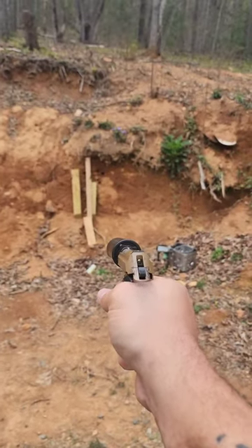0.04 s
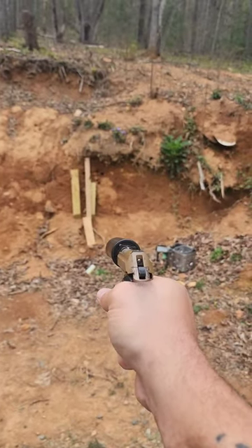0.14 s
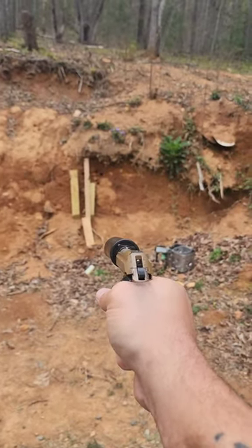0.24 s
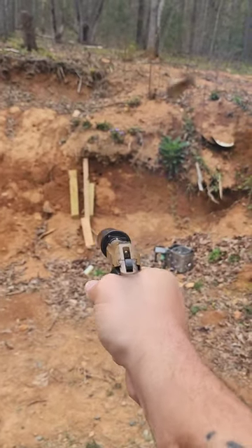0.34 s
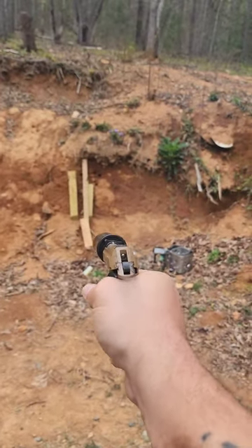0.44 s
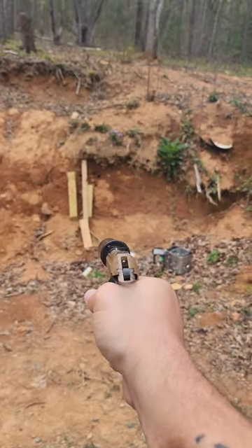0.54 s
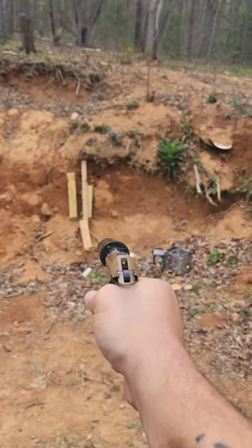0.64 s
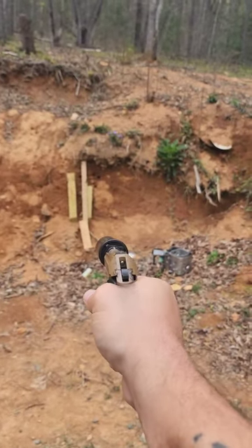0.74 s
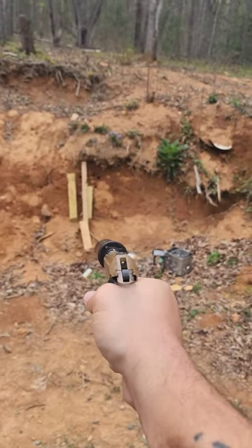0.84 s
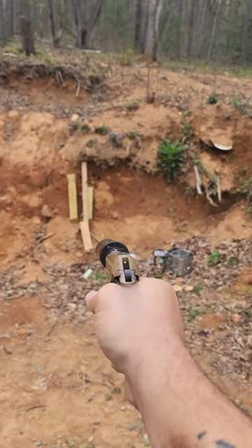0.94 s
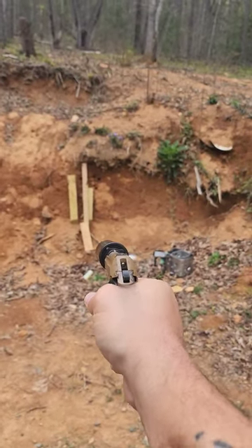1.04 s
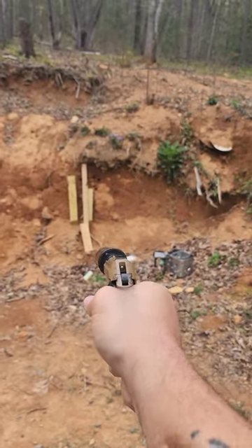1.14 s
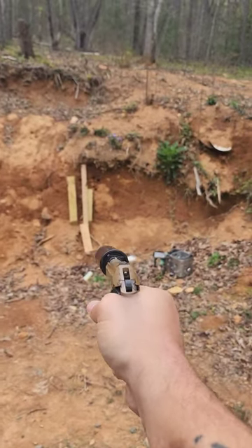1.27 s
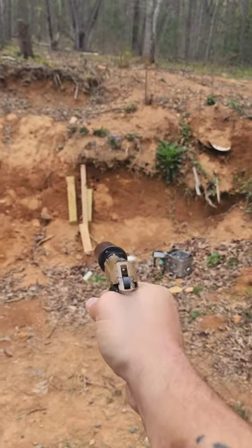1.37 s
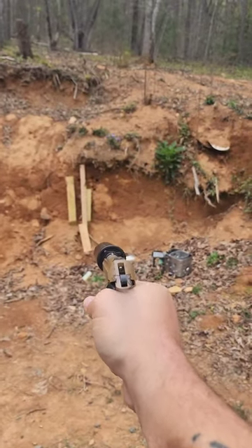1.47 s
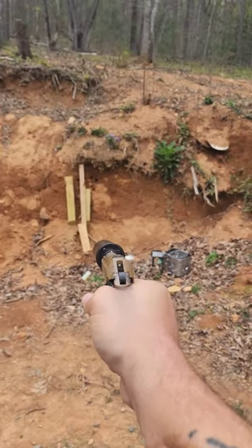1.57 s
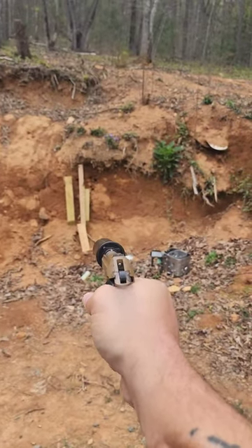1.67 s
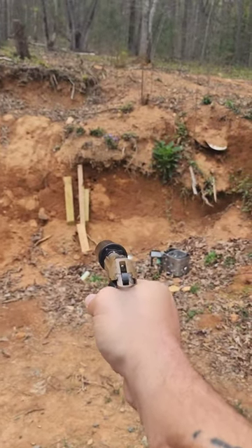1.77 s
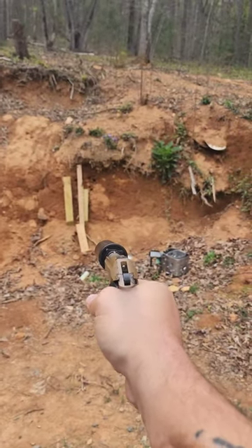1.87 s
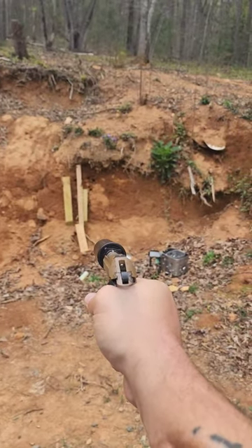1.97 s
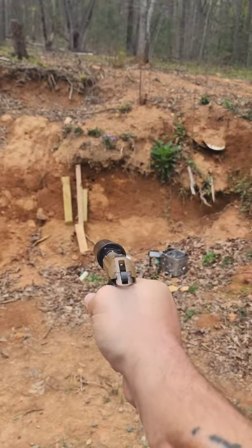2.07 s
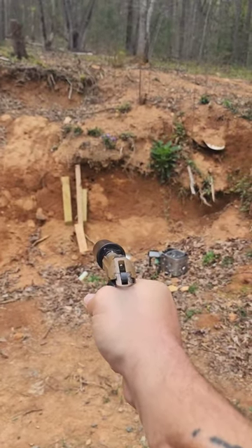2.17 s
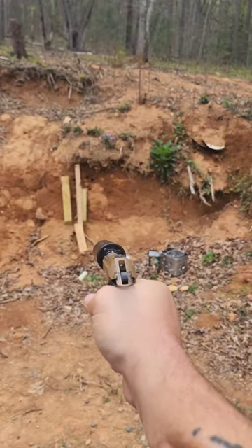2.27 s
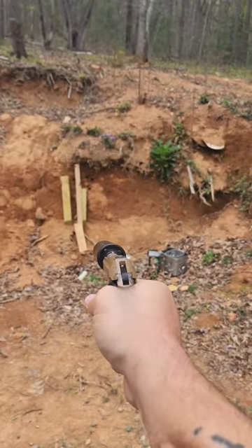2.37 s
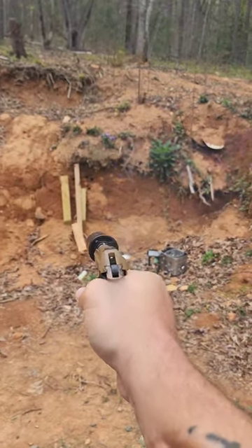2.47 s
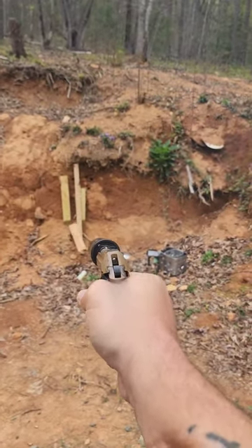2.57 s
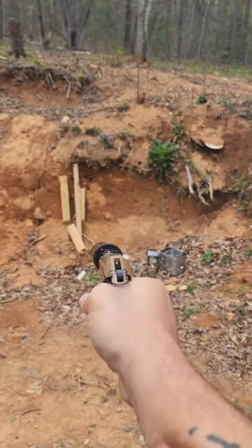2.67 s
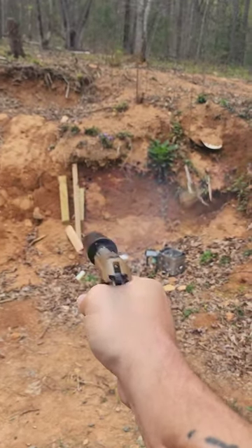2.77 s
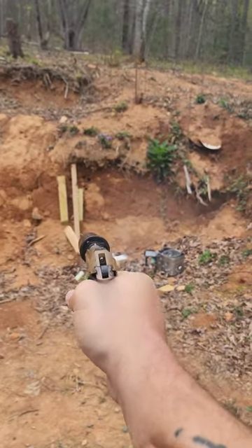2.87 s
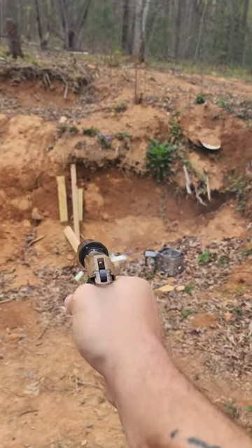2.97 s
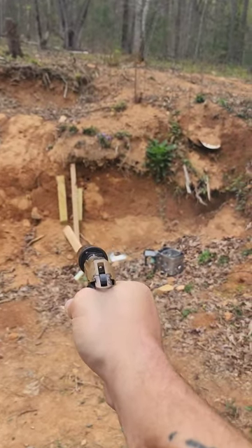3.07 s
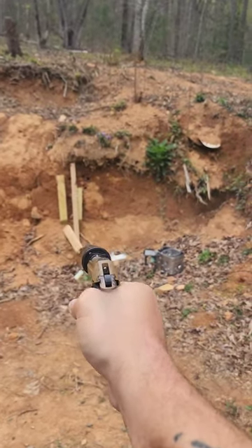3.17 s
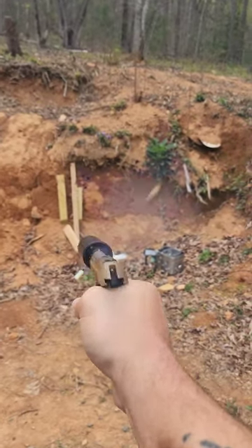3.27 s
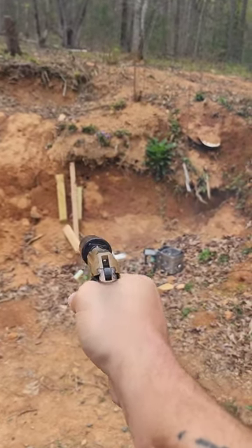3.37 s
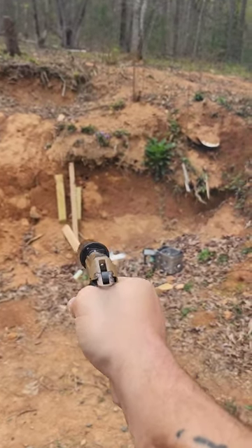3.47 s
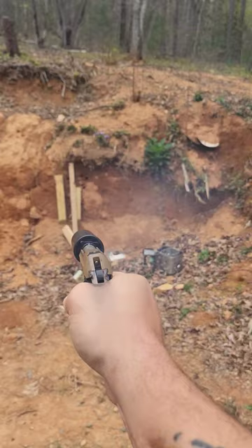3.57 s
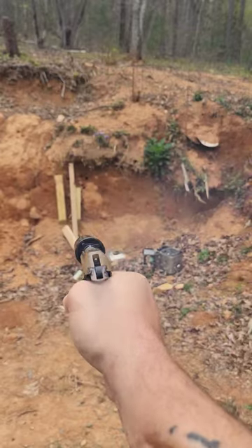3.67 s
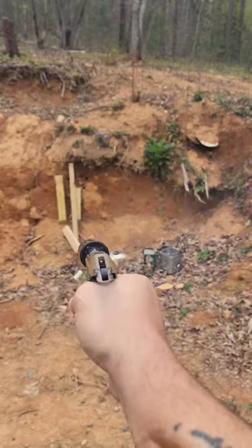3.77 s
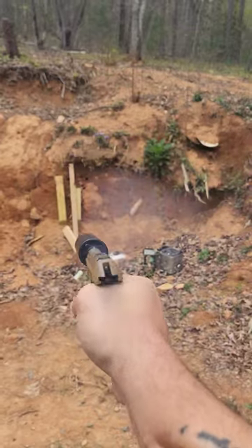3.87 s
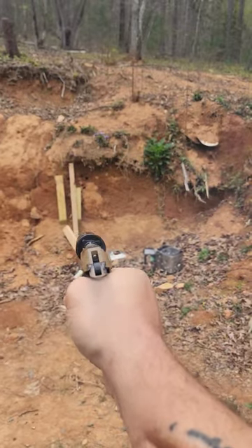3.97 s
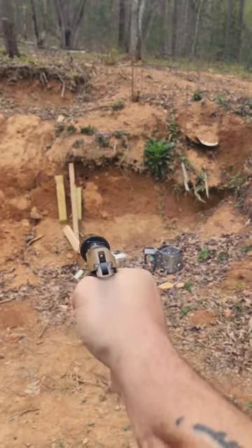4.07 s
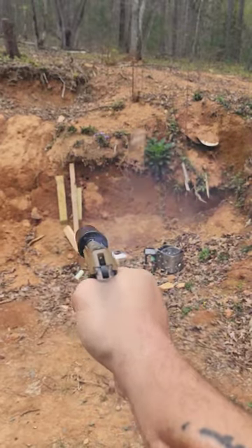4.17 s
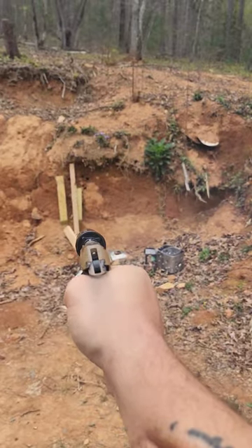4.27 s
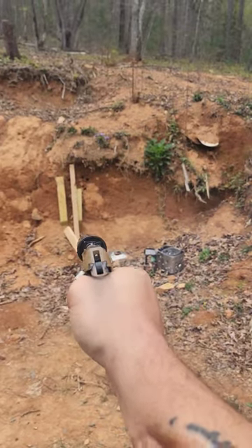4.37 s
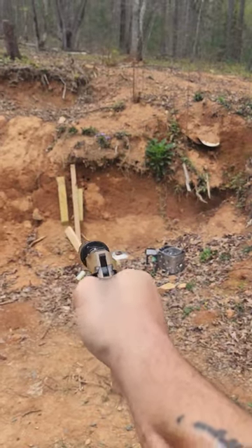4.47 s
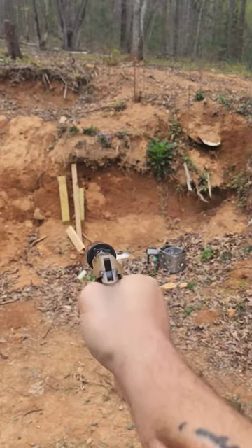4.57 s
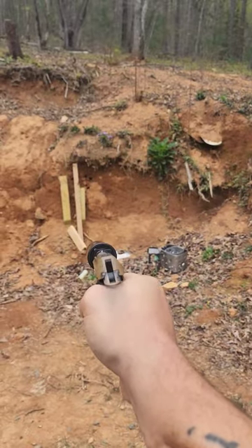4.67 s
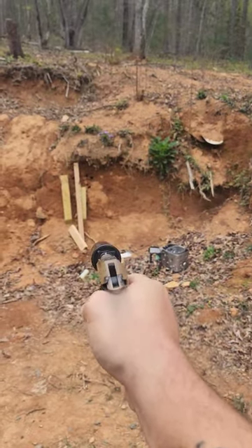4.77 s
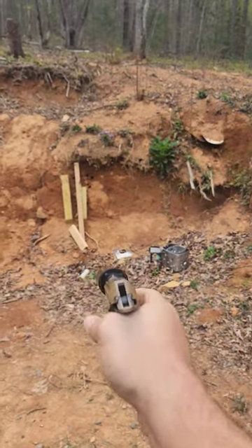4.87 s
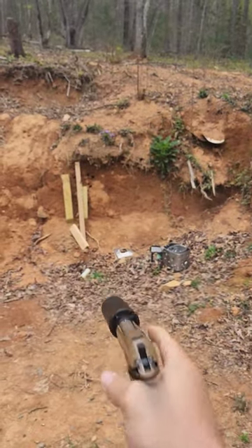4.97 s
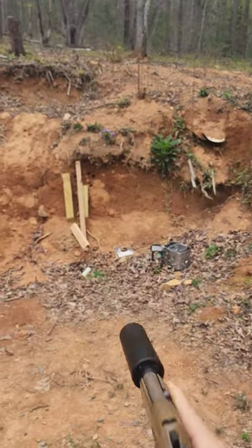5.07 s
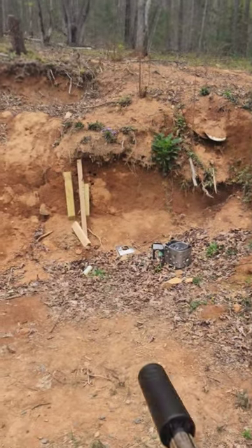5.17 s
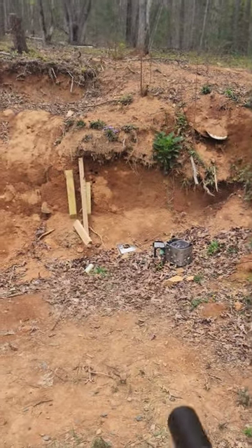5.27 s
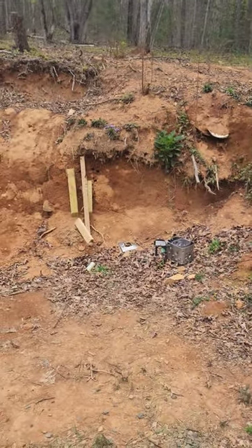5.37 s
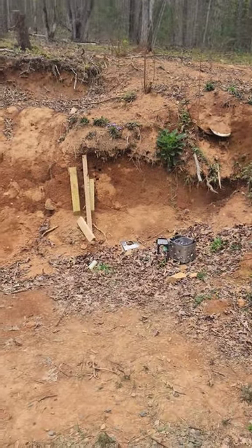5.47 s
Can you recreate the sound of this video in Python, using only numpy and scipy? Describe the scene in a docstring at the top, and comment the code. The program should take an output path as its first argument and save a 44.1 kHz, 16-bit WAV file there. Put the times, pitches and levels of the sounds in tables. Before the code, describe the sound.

At arm's length, a suppressed small pistol cracks once, slapping off a dirt bank and washing through woods. A sharp steel click and ringing brass case break the pause, over very faint breeze and distant engine hum, with one far crow caw. Six rapid shots follow, then a loud dry click and small handling ticks. Close stereo pickup, slightly saturated on the peaks.

```python
"""A suppressed small pistol fires once, then six times in a quick string, at arm's length from a stereo pair.
Each report slaps back from an earth bank and washes away through the woods; the action clicks, cases tinkle.
In the pause a far engine hums and a crow caws once.
Gas, clicks and woods are shaped noise, brass and thumps are damped sines, steel is noise through resonances;
the caw is a stack of harmonics and the engine one unsteady sine."""
import sys
import numpy as np
from scipy import signal
from scipy.fft import rfft, irfft, next_fast_len
from scipy.io import wavfile
from scipy.ndimage import uniform_filter1d, map_coordinates

SR = 44100
rng = np.random.default_rng(int(sys.argv[2]) if len(sys.argv) > 2 else 0)


def dump(signal):
    """Clip the signal to [-1, 1] and save it as 16-bit WAV at the path in sys.argv[1]."""
    limited = np.clip(np.atleast_2d(signal).T, -1, 1)
    pcm = np.round(limited * 32767).astype(np.int16)
    wavfile.write(sys.argv[1], SR, pcm)


N = 244088
TIME = np.arange(N) / SR
SHORT = TIME[:SR // 3]  # the time axis of every brief sound

# the shots: [t/s, blast level/dB, extra bass/dB, echo level/dB]
SHOT_TIMELINE = [(.380, -8, -26, -32.8), (2.5086, -10, 0, -35), (2.8824, -11.5, 1, -40.5),
                 (3.3853, -12, -1, -41), (3.652, -11.5, 0, -44.5), (3.9883, -11.5, 0.5, -42.5),
                 (4.2759, -12, 2, -44.5)]
# tone of a dry metal click: [f/Hz, relative level/dB]
CLICK_TONE = [(800, -17), (2500, -13), (4500, -7.5), (8000, -0.5), (10500, -1.5), (15000, -5)]
# stereo image of the gun: [f/Hz, left-right likeness from -1 to 1]
NEAR_IMAGE = [(110, 0.9), (260, 0.36), (500, 0.57), (1000, .22), (2500, 0.21), (5000, -0.17)]
# stereo image of the surroundings: [f/Hz, left-right likeness from -1 to 1]
WIDE_IMAGE = [(130, .94), (290, 0.94), (550, 0.48), (1400, 0.072), (3000, 0.14)]


def amp(db):
    """Decibels to gain."""
    return 10 ** (np.asarray(db) / 20)


def unit(x):
    """Scale to rms 1."""
    return x / np.sqrt(np.mean(x ** 2) + 1e-20)


def along(points, hz):
    """Read (Hz, value) points on a log frequency axis."""
    f, v = np.transpose(points)
    return np.interp(np.log(hz + 1), np.log(f + 1), v)


def wobble(rate, size=N):
    """A smooth random curve, rate knots a second."""
    return map_coordinates(rng.standard_normal(size // 20), [np.arange(size) * rate / SR], mode="wrap")


def filtered(x, response):
    """Filter x by a response given as a function of frequency."""
    m = next_fast_len(x.shape[-1] + 8192)
    spectrum = rfft(x, m) * response(np.fft.rfftfreq(m, 1 / SR))
    return irfft(spectrum, m)[..., :x.shape[-1]]


def noise(gain, alike, size=len(SHORT)):
    """Stereo noise of rms 1 with a gain and a left-right likeness for each frequency."""
    def mid_side_gain(hz):
        turn = np.arccos(np.clip(along(alike, hz), -1, 1)) / 2
        return gain(hz) * np.array([np.cos(turn), np.sin(turn)])

    mid, side = filtered(rng.standard_normal((2, size)), mid_side_gain)
    return unit(np.array([mid + side, mid - side]))


def colour(spectrum):
    """The gain of a spectrum as a function of frequency, closed below hearing."""
    return lambda hz: amp(along(spectrum, hz)) * (hz > 20)


def burst(gain, rise, hold, t60):
    """A puff of noise that rises, holds and dies away by 60 dB in t60 (all in s)."""
    decay = amp(-60 * np.maximum(SHORT - hold, 0) / t60)
    return noise(gain, NEAR_IMAGE) * np.minimum(SHORT / rise, 1) * decay


def ring(hz, t60, attack=0.00028):
    """A damped sine with a soft start (times in s)."""
    return np.sin(2 * np.pi * hz * SHORT) * amp(-60 * SHORT / t60) * (1 - np.exp(-SHORT / attack))


def add(track, s, sound):
    """Mix a sound into the track at time s."""
    part = track[:, round(s * SR):][:, :sound.shape[-1]]
    part += sound[..., :part.shape[1]]


def outdoors():
    """A dying breeze in the woods and a far engine's unsteady hum; both dip after each shot, the dips pile up."""
    # tone of the breeze: [f/Hz, relative level/dB]
    breeze_tone = [(25, -15), (95, -8), (170, -19), (290, -20.5), (480, -24), (1000, -28.5), (2100, -39),
                   (3800, -50.5), (4050, -41), (4350, -50), (5000, -52), (8000, -58.5), (15000, -67)]
    hum_hz, hum_db = 92.3, -55.5
    breeze_db, fade_db_per_s = -59.5, 2.4
    # the hum takes the whole dip, the breeze a small share; both creep back exponentially
    shot_dip_db, recover_s, breeze_dip_share = 5.5, 1.9, 0.12
    dip_db = shot_dip_db * sum((TIME > s) * np.exp(-abs(TIME - s) / recover_s) for s, *_ in SHOT_TIMELINE)
    hum_phase = 2 * np.pi * np.cumsum(hum_hz + 3.2 * wobble(9)) / SR
    hum = np.sin(hum_phase) * amp(hum_db - dip_db + 1.5 * wobble(3.6))
    level_db = breeze_db - fade_db_per_s * TIME - breeze_dip_share * dip_db
    breeze = noise(colour(breeze_tone), WIDE_IMAGE, size=N) * amp(level_db + 2.2 * wobble(5))
    return hum + breeze


def crow(trees_db=-4.0, trees_t60=.45):
    """One hoarse, far caw: effort arches pitch and level, the throat favours harmonic two, trees smear it."""
    crest_s, width_s, length_s = 2.168, .055, 0.18
    low_hz, high_hz = 610, 720  # pitch at no effort and at full effort
    crest_db, range_db = -59.5, 12  # level before throat and rasp; its drop towards no effort
    effort = np.exp(-((TIME - crest_s) / width_s) ** 2)
    pitch = low_hz + (high_hz - low_hz) * effort
    sounding = abs(TIME - crest_s) < length_s / 2
    level = amp(crest_db - range_db * (1 - effort)) * sounding
    phase = 2 * np.pi * np.cumsum(pitch * (1 + .035 * wobble(350))) / SR
    rasp = amp(3.5 * wobble(160))
    # resonance of the throat: [f/Hz, level/dB]
    throat = [(700, -29), (1250, -1.5), (1450, 1.0), (2150, -14), (2900, -37.5), (3600, -22.5), (4400, -29.5)]
    voice = sum(amp(along(throat, k * pitch)) * np.sin(k * phase) for k in range(1, 7))
    call = level * rasp * voice
    trees = rng.standard_normal((2, len(SHORT))) * amp(-60 * SHORT / trees_t60)
    trees = trees / np.linalg.norm(trees[0])
    return call + amp(trees_db) * signal.fftconvolve(call[None], trees, axes=1)[:, :N]


def ticks(spread_db=4, ticks_per_s=22):
    """The shifting grip sets off a few plain ticks among runs of tiny ones, each a very short click."""
    # spells in which the grip shifts: [start t/s, end t/s, middle level/dB]
    grip_shifts = [(1.35, 1.5, -74), (1.607, 1.782, -62), (4.729, 5.072, -72), (5.101, 5.498, -75)]
    # the plainest ticks: [t/s, level/dB]
    plain_ticks = [(1.3672, -74), (1.4426, -62), (4.74, -60.5), (4.8746, -63), (4.897, -60.5),
                   (5.2859, -68), (5.4281, -64)]
    out = np.zeros((2, N))
    tiny_ticks = []
    for start, end, db in grip_shifts:
        for place, size in rng.random((round(ticks_per_s * (end - start)), 2)):
            tiny_ticks.append((start + place * (end - start), db + spread_db * (2 * size - 1)))
    for s, db in list(plain_ticks) + tiny_ticks:
        add(out, s, amp(db) * burst(colour(CLICK_TONE), rise=0.00037, hold=0.0012, t60=0.017))
    return out


def handling():
    """Dry steel clicks of the action with a faint echo off the ground, and dull knocks of the hand."""
    # clicks: [t/s, level/dB, body re click/dB, left minus right/dB, echo re click/dB]
    action_clicks = [(1.5358, -23, -22.5, -14, -26.5), (1.6557, -50, -24, -12, -26),
                     (1.694, -46.5, -27, -7, -27), (4.584, -19, -13, 7, -36), (4.8, -48.5, -26, 6, -25)]
    # dull knocks: [t/s, level/dB, bass level/dB]
    hand_knocks = [(0.9935, -46.5, -41.5), (5.022, -44, -44), (5.4888, -53.5, -62)]
    # tone of a knock: [f/Hz, relative level/dB]
    knock_tone = [(50, -12), (250, 1.5), (800, -1.5), (2200, -12), (5000, -22), (15000, -38)]
    out = np.zeros((2, N))
    for s, db, body_db, pan_db, echo_db in action_clicks:
        pan = amp(pan_db / 2 * np.array([[1], [-1]]))
        snap = burst(colour(CLICK_TONE), rise=0.00057, hold=0.0011, t60=0.012) * pan
        body = burst(colour(knock_tone), rise=0.00027, hold=0.0018, t60=0.008)
        echo = burst(colour(CLICK_TONE), rise=0.0047, hold=0.024, t60=0.12)
        add(out, s, amp(db) * (snap + amp(body_db) * body + amp(echo_db) * echo))
    for s, db, bass_db in hand_knocks:
        knock = burst(colour(knock_tone), rise=0.0013, hold=0.0018, t60=0.021)
        bass = ring(hz=116, t60=0.073, attack=0.0023)
        add(out, s, amp(db) * knock + amp(bass_db) * bass)
    return out


def cases():
    """A spent brass case rings in close, beating modes, at new strengths on every touch."""
    # touches on the ground: [t/s, ring level/dB]
    touchdowns = [(.815, -78), (1.537, -43), (1.657, -54), (1.773, -62), (1.824, -72), (4.82, -75),
                  (5.057, -72.5), (5.49, -72)]
    # modes of a case: [f/Hz, mean level/dB, t60/s]
    brass_modes = [(7650, -13, 0.18), (11570, -2, 0.21), (11615, 1, 0.19), (11595, -2, .19),
                   (12390, -17, .3)]
    out = np.zeros((2, N))
    for s, db in touchdowns:
        modes = sum(amp(level + rng.normal(0, 1.3)) * ring(hz, t60) for hz, level, t60 in brass_modes)
        touch = burst(colour(CLICK_TONE), rise=0.00046, hold=.001, t60=0.0081)
        add(out, s, amp(db) * (modes * amp([[-2], [1]]) + amp(2) * touch))
    return out


def swells(growth_db_per_s=1000, length=0.032):
    """The first two reports swell in, wide and hollow: hiss and a wavering tone grow up to a sudden stop."""
    # swells: [crest t/s, hiss level/dB, whoop level/dB, whoop f/Hz]
    rising_swells = [(.3775, -12, -16, 405), (.377, -29, -15.5, 1060), (.374, -28.5, -21, 880),
                     (2.508, -16, -26.5, 1130)]
    # tone of the hiss: [f/Hz, relative level/dB]
    hiss_tone = [(400, -31.5), (2500, -7.5), (8000, -5.5), (13000, -5)]
    out = np.zeros((2, N))
    ahead = SHORT[::-1]  # time left before the crest
    growth = amp(-growth_db_per_s * np.maximum(ahead - .003, 0))
    rising = growth * np.clip(ahead / 0.00051, 0, 1) * np.clip((length - ahead) / .003, 0, 1)
    for s, hiss_db, whoop_db, hz in rising_swells:
        hiss = noise(colour(hiss_tone), NEAR_IMAGE)
        sway = .5 * wobble(120, size=len(SHORT))
        stereo_phase = np.array([[0], [1.6]])  # the right side leads, so the whoop sounds wide
        whoop = np.sin(2 * np.pi * hz * SHORT + sway + stereo_phase)
        add(out, s - len(SHORT) / SR, rising * (amp(hiss_db) * hiss + amp(whoop_db) * whoop))
    return out


def woods(bass, treeline=0.093, spreading=.98, near_db=-4, trunks_db=1.24, patchy_db=1.6):
    """Countless trunks scatter a shot in coloured clumps: strongest at the tree line, then weaker and duller."""
    # tone of the scattered shot: [f/Hz, relative level/dB]
    woods_tone = [(40, -14), (130, -0.5), (280, -1.5), (480, -9.5), (1100, -12.5), (1700, -7), (2150, 0.5),
                  (3200, -2), (4500, 0.5), (6500, -1), (8300, 0.5), (10000, -7), (15000, -11)]
    # decay of the wash, before the loss with distance: [f/Hz, t60/s]
    woods_decay = [(100, 1.9), (1000, 7.6), (2500, 3.9), (5000, 2.22), (8000, 1.2), (12000, 1.1)]
    t = TIME[:2 * SR]
    scattered = noise(lambda hz: colour(woods_tone)(hz) * bass(hz) ** .5, WIDE_IMAGE, size=len(t))
    hz, frames, z = signal.stft(scattered, SR, nperseg=256)
    # random patches in frequency and time
    clumps = uniform_filter1d(rng.standard_normal(z.shape[1:]), size=3, axis=0)
    clumps = unit(uniform_filter1d(clumps, size=16, axis=1))
    decay_db = 60 * frames / along(woods_decay, hz)[:, None]
    wash = signal.istft(z * amp(patchy_db * clumps - decay_db), SR, nperseg=256)[1][:, :len(t)]
    swell = amp(near_db * np.clip((treeline - t) / 0.052, 0, 1)) * np.minimum(t / 0.021, 1)
    distance = np.maximum(t / (treeline + 0.016), 1) ** -spreading
    trunks = amp(trunks_db * wobble(300, size=len(t)) + .8 * wobble(34, size=len(t)))
    return wash * swell * distance * trunks


def steel(hz):
    """The resonances of slide and barrel, summed as band-pass peaks."""
    # modes: [f/Hz, width/Hz, level/dB]
    steel_modes = [(2720, 130, -5.5), (4680, 32, -6), (5030, 69, -5), (5510, 41, -3), (6240, 140, -5.5),
                   (6470, 79, -7), (7420, 90, -4), (8180, 150, -3), (11330, 500, -8.5)]
    return abs(sum(amp(db) * 1j * hz * w / (c * c - hz * hz + 1j * hz * w) for c, w, db in steel_modes))


def shock(width=.00009):
    """The pressure front: a jump, then a short suction (width in s)."""
    u = SHORT / width
    return np.diff(u * np.exp(-u), append=0) * width * SR


def pistol(spit_delay=.0085, bank_delay=.0265, slide_delay=.0305, bass_hz=550, rattle_db=2.0):
    """Each shot: shock, blast and thump, gas from the opening port, the slide's return, then bank and woods."""
    # tones of the muzzle blast, the port gas and the bank's echo: [f/Hz, relative level/dB]
    blast_tone = [(30, -19), (55, -13), (85, -4.5), (170, 3), (310, 2), (480, -1), (750, -1), (1100, -1),
                  (1550, -5), (2300, 1), (3200, -4), (4000, -0.5), (7500, -4.5), (10000, -6.5), (15000, -7)]
    spit_tone = [(400, -27), (3000, -8), (7500, -4), (9700, -10), (11700, -5), (15000, -10)]
    slap_tone = [(30, -12), (120, -0.5), (290, 2.5), (480, -5), (750, -6.5), (1300, -3), (1750, -5),
                 (2600, 1), (4000, -1), (7800, -3.5), (10000, -9), (15000, -11)]
    # brief hollow rings as some shots strike home: [t/s, f/Hz, level/dB]
    strike_rings = [(0.409, 1388, -22.5), (0.416, 274, -33), (2.544, 1380, -29.5), (3.412, 1360, -22)]
    spit_db = -4  # port gas relative to the blast, before panning
    # the near bank: its level for an echo of 0 dB, and the share of the echo's changes that it follows
    slap_db, slap_follows = 5, 0.67
    out = np.zeros((2, N))
    for s, blast_db, bass_db, echo_db in SHOT_TIMELINE:
        bass = lambda hz: amp(bass_db / (1 + (hz / bass_hz) ** 2))
        gas = lambda hz: colour(blast_tone)(hz) * bass(hz)
        blast = burst(gas, rise=0.0014, hold=0.0041, t60=0.025)
        blowdown = burst(gas, rise=.006, hold=0.031, t60=0.075)  # the silencer empties slowly
        rattle = burst(steel, rise=0.0094, hold=0.018, t60=0.097)
        rattle = rattle * amp(rattle_db * wobble(500, size=len(SHORT)))
        thump = ring(hz=124, t60=0.032, attack=.003) + amp(-13.5) * ring(hz=295, t60=0.071, attack=0.0016)
        thump = -amp(bass_db) * thump
        report = blast + amp(-17.5) * blowdown + amp(-13.5) * rattle + amp(-1.0) * thump
        add(out, s, amp(blast_db) * report)
        add(out, s + 0.00083, -amp(blast_db + 8.5) * shock())

        spit = burst(colour(spit_tone), rise=.001, hold=.004, t60=.018) * amp([[-4], [1]])
        hiss = burst(colour(spit_tone), rise=0.0017, hold=.02, t60=0.15)
        add(out, s + spit_delay, amp(blast_db + spit_db) * (spit + amp(-15) * hiss))

        # the rough face of the bank returns the blast in uneven pieces
        slap = burst(lambda hz: colour(slap_tone)(hz) * bass(hz), rise=0.0009, hold=0.0072, t60=0.057)
        slap = slap * amp(1.6 * wobble(600, size=len(SHORT))) * amp([[.5], [-1.5]])
        boom = amp(bass_db) * ring(hz=112, t60=0.05, attack=0.0019)
        add(out, s + bank_delay, amp(slap_db + slap_follows * echo_db) * (slap + amp(-3.0) * boom))

        clack = burst(steel, rise=0.0012, hold=0.0019, t60=0.052) * amp([[1], [-5]])
        add(out, s + slide_delay, amp(blast_db - 13) * clack)
        add(out, s, amp(echo_db) * woods(bass))
    for s, hz, db in strike_rings:
        add(out, s, amp(db) * ring(hz, t60=0.081, attack=0.0021))
    return out


def scene():
    """Everything heard from the firing point."""
    return outdoors() + crow() + ticks() + handling() + cases() + swells() + pistol()


def record(dry):
    """Two microphone ports colour the treble differently and shed deep bass; peaks saturate, the top is cut."""
    # treble colour of the ports: [f/Hz, left minus right/dB]
    port_balance = [(300, 0.5), (900, 1), (2400, 1.5), (4400, -0.5), (8100, 10.5), (10000, 0.5),
                    (12000, -6.5), (15000, -1.5)]
    top_hz = 15750

    def ports(hz):
        low_cut = (1j * hz / (1j * hz + 22)) ** 2
        balance_db = along(port_balance, hz)
        return low_cut * amp(np.array([balance_db, -balance_db]) / 2)

    ported = filtered(dry, ports)
    limited = ported / (1 + ported ** 4) ** (1 / 4)
    return filtered(limited, lambda hz: 1 / np.sqrt(1 + (hz / top_hz) ** 220))


dry = scene()
out = record(dry)
dump(out)
```